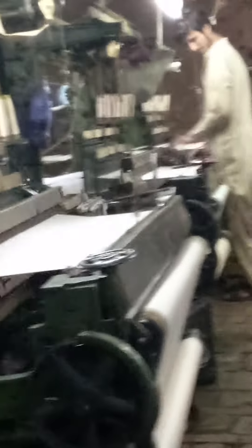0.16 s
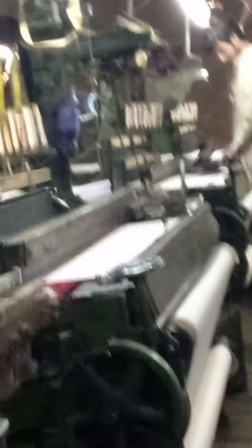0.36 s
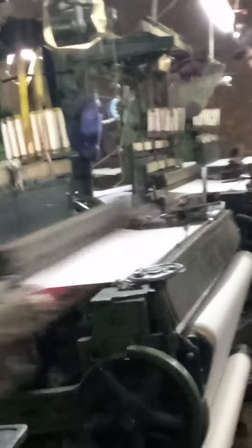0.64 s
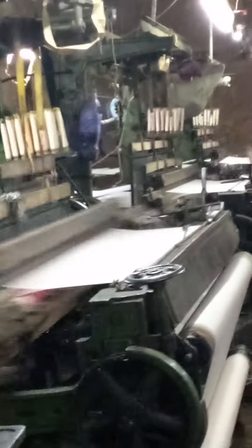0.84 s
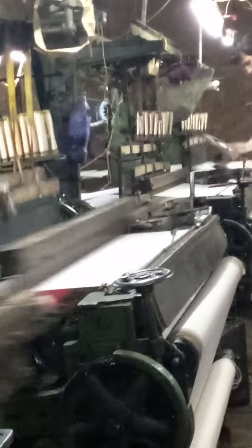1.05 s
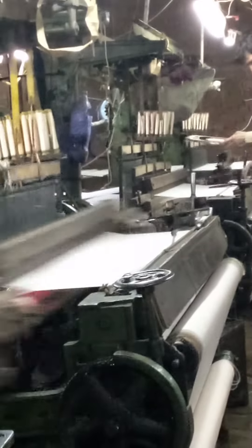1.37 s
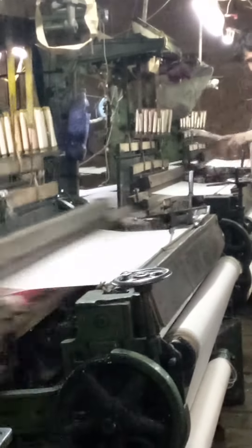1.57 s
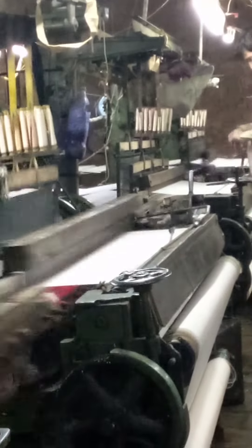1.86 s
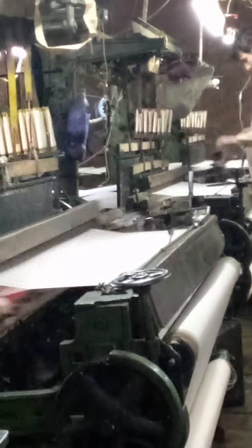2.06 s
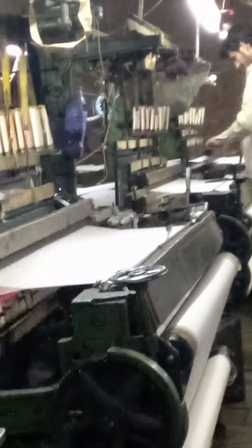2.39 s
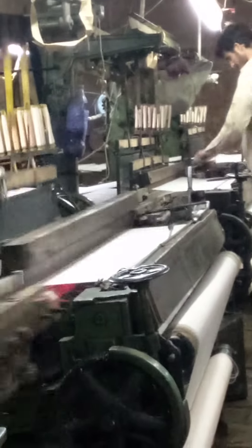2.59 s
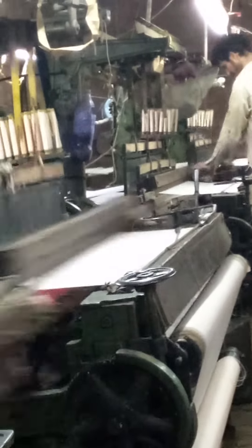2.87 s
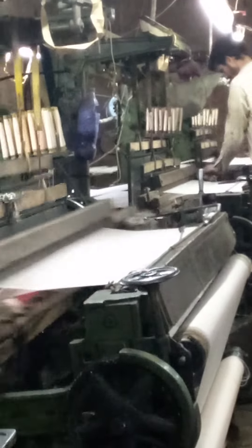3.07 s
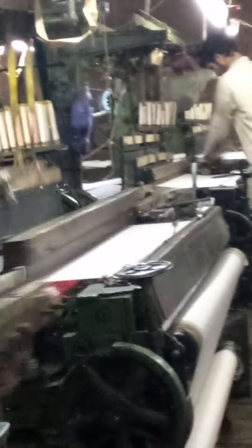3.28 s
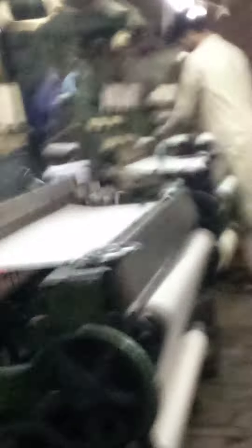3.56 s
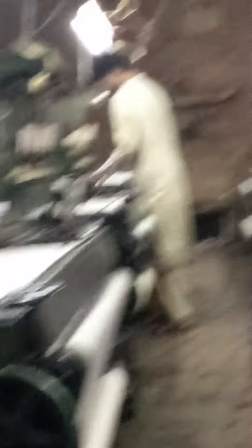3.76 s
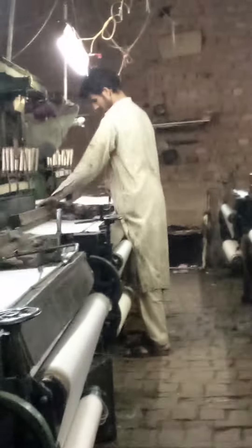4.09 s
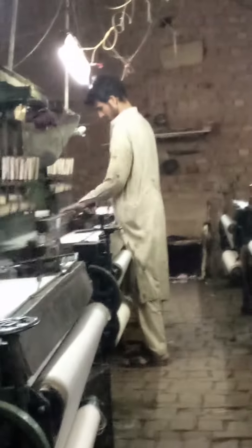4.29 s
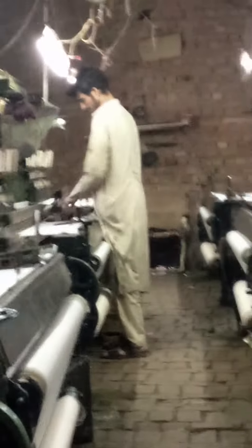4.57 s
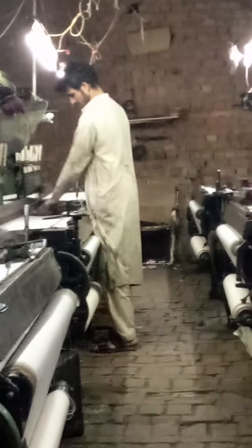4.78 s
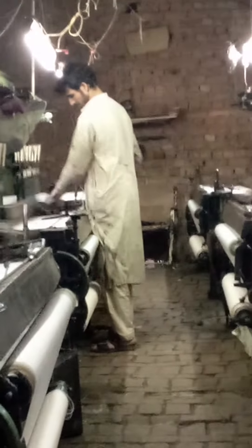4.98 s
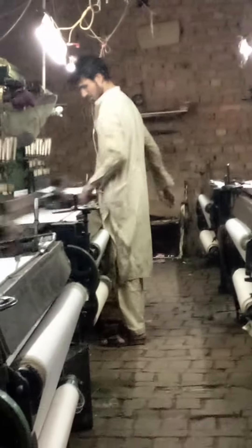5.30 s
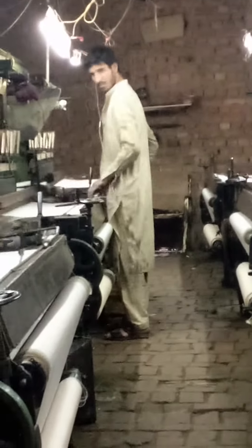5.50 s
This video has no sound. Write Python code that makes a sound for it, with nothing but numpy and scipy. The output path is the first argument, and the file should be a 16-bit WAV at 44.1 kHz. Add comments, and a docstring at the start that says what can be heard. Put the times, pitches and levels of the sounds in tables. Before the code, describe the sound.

From the first moment to the end at about 5.6 seconds, many power looms run in a low brick shed, making a loud, steady, dense clatter. The nearest looms strike sharp, briefly ringing metal knocks, several per second, mixed with thin ticks from loose steel parts and dull, heavy thuds. Each machine repeats its pattern roughly every 0.7 seconds, at a slightly different speed, so the beats drift and interlock. Harder cracks stand out near 0.1, 2.4 and 5.3 seconds. Two faint, high pings from small steel rods come at about 2 and 2.5 seconds, almost buried. Behind this, the other looms and their short echoes merge into a continuous din that swells slightly with each shuttle throw, over the low rumble of the drives. The small microphone is close to the machines, sounds harsh in the upper mids, and dips momentarily on the hardest blows.

```python
"""A low brick shed where rows of shuttle looms are running. Near looms at four slightly different speeds
beat out seven repeating series of knocks, ticks and thuds, and small steel rods ping twice. The blows of
all the other looms merge with their echoes into a din that swells with each pick (one throw of the
shuttle), over the rumble of the drives. A small microphone that favours the upper middle tones hears it
all, and its gain control turns the sound down for the hardest blows."""
import sys
import numpy as np
from scipy import signal
from scipy.fft import rfft, irfft
from scipy.io import wavfile
from scipy.ndimage import uniform_filter1d

SR = 44100
rng = np.random.default_rng(int(sys.argv[2]) if len(sys.argv) > 2 else 0)


def put_to_file(sound):
    """Save the sound as 16-bit audio at rate SR, in the file named by the first command-line argument."""
    columns = np.atleast_2d(sound).T  # one column per channel
    safe = np.clip(columns, -1, 1)
    whole_steps = np.round(safe * 32767)
    wavfile.write(sys.argv[1], SR, whole_steps.astype(np.int16))


N = 248724


def from_db(db):
    """Turn decibels into a factor to multiply a sound by."""
    return 10 ** (np.asarray(db) / 20)


def rms_one(x):
    """Scale a sound to an average strength (rms) of 1."""
    return x / np.sqrt(np.mean(x ** 2) + 1e-20)


def curve(points, repeat_s=None):
    """Join (time, value) points with straight lines, repeating if asked."""
    return np.interp(np.arange(N) / SR, *np.transpose(points), period=repeat_s)


def coloured(x, low_hz, high_hz, size=8192):
    """Keep one band of a sound and give it the tone of the iron frames, shed and microphone."""
    # how strongly these three together pass each frequency: (frequency [Hz], level [dB])
    tone = [(15, -66), (25, -42), (130, -9.5), (292, -9), (750, -5.5), (1220, -6.5), (1640, -3),
            (2040, -11), (2970, -3.5), (3500, -9), (4460, -25.5), (5530, -15), (8300, -24), (14200, -29.5),
            (15900, -39)]
    tone_hz, tone_db = np.transpose(tone)
    hz = np.maximum(np.arange(size // 2 + 1) * SR / size, 1)
    gain = from_db(np.interp(np.log(hz), np.log(tone_hz), tone_db))
    gain *= from_db(5 * np.exp(-((hz - 14500) / 2200) ** 2))   # the microphone's opening resonates
    gain /= np.sqrt((1 + (low_hz / hz) ** 8) * (1 + (hz / high_hz) ** 8))
    # a minimum-phase filter: nothing sounds before the blow that causes it
    cepstrum = irfft(np.log(gain + 1e-9))
    cepstrum[1:size // 2] *= 2
    cepstrum[size // 2 + 1:] = 0
    response = irfft(np.exp(rfft(cepstrum)))
    return signal.fftconvolve(x, response / np.sqrt(np.sum(response ** 2)))[:N]


def strike_shape(t, db, fade_s, rise_s):
    """The strength of one blow: it rises fast and dies away. A fade time is the time to fall 60 dB."""
    return from_db(db - 60 * t / max(fade_s, .004)) * (1 - np.exp(-t / rise_s))


def bursts(times, levels_db, fades_s, rise_s):
    """The strength of many blows over time; where they overlap, their power adds up."""
    power, t = np.zeros(N), np.arange(SR // 4) / SR
    for s, db, fade_s in np.broadcast(times, levels_db, fades_s):
        i = round(s * SR)
        power[i:i + len(t)] += strike_shape(t, db, fade_s, rise_s)[:N - i] ** 2
    return np.sqrt(power)


def rings(times, levels_db, pitches_hz, fades_s, rise_s):
    """Each struck part rings briefly with two close tones of its own."""
    out, t = np.zeros(N), np.arange(SR // 8) / SR
    chance = rng.random((len(times), 2))
    for s, db, hz, fade_s, (apart, phase) in zip(times, levels_db, pitches_hz, fades_s, chance):
        i = round(s * SR)
        second_hz = hz * (.85 + .309 * apart)
        pair = np.sin(2 * np.pi * hz * t) + .9 * np.sin(2 * np.pi * (second_hz * t + phase))
        out[i:i + len(t)] += (pair * strike_shape(t, db, fade_s, rise_s))[:N - i]
    return out


def turn_after_turn(patterns, singles, level_columns, spread_db=1.5):
    """Repeat each series' pattern every turn, with uneven force; add the single hits; return columns."""
    # the turns (two picks each) of the near looms, one list per series: (time [s], force [dB])
    series_turns = [
        [(.4654, -2), (1.1858, -1), (1.906, -2), (2.6229, -0.5), (3.3459, -1.5), (4.0657, -1.5), (4.788, -4.5),
         (5.512, -5)],
        [(.127, 1.5), (.8435, 2.5), (1.5574, 0.), (2.2747, 2.5), (2.9891, -1), (3.7091, 3), (4.4253, 2.5),
         (5.1438, -0.5)],
        [(.3298, -0.5), (1.0346, -3), (1.7443, 1), (2.4575, 2), (3.1667, 2.5), (3.876, -1), (4.5809, -2.5),
         (5.2821, 0.)],
        [(.157, 1), (.887, 0.), (1.621, -3), (2.353, 1), (3.087, -4), (3.818, 1), (4.55, -2), (5.281, 7.5)],
        [(.2554, 2.5), (.9776, 3), (1.7022, 1), (2.4147, 0.), (3.137, -2), (3.862, -3), (4.5783, 3.),
         (5.2988, 1.5)],
        [(.6944, -7), (1.4061, 6.5), (2.1158, 1.5), (2.8327, 1), (3.5339, 2.5), (4.2422, 2), (4.9475, -3.5)],
        [(.713, 6), (1.4445, -13), (2.1743, 5), (2.906, 2), (3.633, 2.), (4.3638, 4.5), (5.1052, 3.5)],
    ]
    rows = []
    for turns, pattern in zip(series_turns, patterns):
        for s, force_db in turns:
            for delay_s, *values in pattern:
                levels = np.add(values[:level_columns], force_db + spread_db * rng.standard_normal())
                rows.append((s + delay_s, *levels, *values[level_columns:]))
    return np.transpose([row for row in rows + list(singles) if .05 < row[0] < N / SR])


def rumble():
    """The low roar of the drives and the shaking floor."""
    # shafts, gears and floor: (time [s], level [dB])
    loudness = [(0, -34.5), (1.5, -35.5), (3, -35), (4.5, -34.5), (5.64, -36)]
    return from_db(curve(loudness)) * coloured(rng.standard_normal(N), 8.9, 224)


def far_looms(blows_per_s=700, spread_db=3.5, ring_fade_s=.027):
    """A din of random, uneven blows: some crack, some ring briefly, most drown in their echoes."""
    # the din's middle band before the swells are added: (time [s], level [dB])
    loudness = [(0.0, -19.5), (1.63, -21), (1.79, -21), (2.54, -20), (2.78, -19.5), (3.27, -20.5),
                (4.21, -21), (4.32, -21), (4.81, -19.5), (5.23, -21), (5.64, -20.5)]
    # swells with the picks of the faster and the slower looms: (time in the turn [s], level change [dB])
    fast_swell = [(0, 0.59), (.06, -0.81), (.14, 0.3), (.24, -0.64), (.33, 0.24), (.42, -0.71), (.52, 0.98),
                  (.62, -0.093), (.68, .6)]
    slow_swell = [(0, -0.063), (.1, 0.39), (.18, -.5), (.26, -0.5), (.32, 0.39), (.4, -1.2), (.48, 0.93),
                  (.57, -0.019), (.64, 0.95)]
    # the din's low, middle and high bands: (bottom [Hz], top [Hz])
    bands = [(300, 2000), (2000, 4500), (4500, 20000)]
    sizes = from_db(spread_db * np.minimum(rng.exponential(1, N), 4.5)) * rng.choice([-1, 1], N)
    clicks = rms_one(sizes * (rng.random(N) < blows_per_s / SR))
    struck_part, ringing = rng.integers(0, 32, N), 0   # each click strikes one of 32 parts
    decay = from_db(-60 / (ring_fade_s * SR))
    for part, hz in enumerate(np.geomspace(600, 7000, 32)):
        resonator = [1, -2 * decay * np.cos(2 * np.pi * hz / SR), decay * decay]
        ring = signal.lfilter([1], resonator, clicks * (struck_part == part) + 1e-18)
        ringing += np.sqrt(hz) * rms_one(ring)   # higher parts stand for a wider range of pitches
    echoes = rng.standard_normal(N)
    din = rms_one(from_db(-8) * clicks + from_db(-12) * rms_one(ringing) + echoes)
    middle_db = curve(loudness) + curve(fast_swell, repeat_s=.709) + curve(slow_swell, repeat_s=.72)
    swing_db = middle_db - middle_db.mean()
    levels_db = [swing_db - 24.5, middle_db, swing_db - 35]
    return sum(from_db(db) * coloured(din, *band) for db, band in zip(levels_db, bands))


def shed_echoes(x, fade_s=.11):
    """Walls and machines throw back so many echoes that they blur into a dying tail of noise."""
    t = np.arange(SR) / SR
    tail = rng.standard_normal(SR) * from_db(-60 * t / fade_s) * (t > .006)
    return signal.fftconvolve(x, tail / np.sqrt(np.sum(tail ** 2)))[:N]


def rod_pings():
    """Small steel rods ring with a thin, high note."""
    # struck rods: (time [s], level [dB], pitch [Hz], fade time [s])
    pings = [(2.025, -22, 14000, .03), (2.5, -41, 4970, .06)]
    return rings(*np.transpose(pings), rise_s=.002)


def thuds():
    """Heavy, dull blows carried by the frames and the floor."""
    # the sley, a swinging beam, beats the thread in; per series: (time in the turn [s], level [dB])
    patterns = [
        [(-.41, -20.5)],
        [],
        [(.33, -19)],
        [(.44, -15.5)],
        [],
        [],
        [],
    ]
    # thuds that do not repeat: (time [s], level [dB])
    singles = [(.218, -19), (1.015, -21), (1.37, -13.5), (2.224, -13), (2.45, -22), (2.79, -16),
               (2.956, -14.5), (3.241, -14), (3.996, -15), (5.256, -23)]
    times, level_db = turn_after_turn(patterns, singles, level_columns=1)
    strength = bursts(times, level_db - 7.5, fades_s=.13, rise_s=.005)
    return coloured(rng.standard_normal(N) * strength, 130, 614)


def rattles():
    """Loose, thin steel parts tick and chatter in the treble, swelling fast and fading a bit slower."""
    # per series: (time in the turn [s], level below 8.8 kHz [dB], level above [dB], rise time [s])
    patterns = [
        [(0.0001, -25, -28.5, .0058)],
        [(.0001, -36, -29.5, .001), (.213, -31, -33.5, 0.0024)],
        [(-.143, -25, -30.5, .0013), (.0001, -35, -25.5, .001)],
        [(.0001, -33, -36, .001)],
        [(.003, -33, -33, 0.00089)],
        [],
        [],
    ]
    # ticks that do not repeat: (time [s], then the same columns)
    singles = [(.0867, -37, -32, 0.0011), (.2654, -22, -36, .0007), (1.67, -40, -34, .002),
               (4.5809, -32, -31, .0007), (2.79, -36, -36, .0011), (3.7984, -36, -30, 0.00094),
               (4.5417, -38, -34, .0018), (4.701, -21, -31, 0.00056), (4.7187, -28, -36, 0.00056),
               (5.473, -25, -34, 0.00039)]
    t, lower, upper = np.arange(N) / SR, np.zeros(N), np.zeros(N)
    for s, lower_db, upper_db, rise_s in turn_after_turn(patterns, singles, level_columns=2).T:
        span = slice(round((s - .04) * SR), round((s + .06) * SR))
        past_peak = (t[span] - s) / max(rise_s, .0004)
        swell = np.exp(-np.where(past_peak < 0, past_peak, .54 * past_peak) ** 2)
        lower[span] += from_db(lower_db - 3) * swell
        upper[span] += from_db(upper_db + .1) * swell
    noise = rng.standard_normal((2, N))
    return coloured(noise[0] * lower, 6200, 8800) + coloured(noise[1] * upper, 8800, 18000)


def knocks(pitch_spread=.045):
    """Each blow of a near loom is a crack, a short chatter and a ring; the highest band dies first."""
    # blows, per series: (time in the turn [s], level [dB], pitch of the struck part [Hz],
    # low band offset [dB], high band offset [dB], fade time of the ring [s])
    patterns = [
        [(-.385, -15, 2760, 0, -25, .022), (.011, -17, 3000, -12, 2, .025)],
        [(-.001, -12, 2840, 2, -21, 0.023), (0, -13, 1650, -11, -25, 0.035), (.212, -5.5, 3030, -9, -18, 0.017),
         (.333, -13.5, 2960, -10, -16, 0.036), (.354, -7, 3007, -7, -24, 0.03),
         (.384, -20, 2920, -6, -24, 0.021), (.49, -20, 2900, -1, -15, 0.026), (.518, -16, 3120, 0, -11, 0.03)],
        [(-.143, -6.5, 3210, -21, -29, 0.021), (-.001, -8, 2956, -2, -12, 0.018), (0, -7, 1460, -9, -25, 0.021),
         (.21, -6.5, 2770, -1, -20, 0.027), (.339, -19, 1480, -1.5, -23, 0.01)],
        [(-.001, -7.5, 1500, -3.5, -16, 0.011)],
        [(0, -4, 2790, -10, -22, 0.016)],
        [(0, -7, 3050, -7.5, -13, 0.017), (.001, -8.5, 1680, -7, -18, .022)],
        [(0, -12, 3310, -10, -21, 0.0092)],
    ]
    # blows that do not repeat: (time [s], then the same columns)
    singles = [(0.1042, 0, 2940, -13, -19, 0.022), (0.665, -17, 2860, 0, -19, 0.029),
               (0.9328, -22, 3230, 5, -19, 0.022), (0.9973, -19, 3000, -9, -17, 0.019),
               (1.016, -12, 2700, -11, -15, 0.019), (1.0829, -20, 2830, -14, -21, 0.016),
               (1.477, -15, 2870, -1, -19, 0.022), (1.543, -16, 1630, 2, -23, 0.025),
               (1.6396, -6, 3100, -9, -16, 0.0075), (1.8284, -13, 2970, -11, -16, 0.025),
               (1.8561, -7, 3040, -9, -12, 0.022), (2.013, -14, 2830, -9, -19, 0.022),
               (2.228, -11.5, 1410, -16, -19, 0.022), (2.2614, -7, 2620, -8, -23, 0.022),
               (2.4015, -2.5, 2800, -2, -19, 0.016), (2.648, -12, 3030, -9, -19, 0.013),
               (2.9574, -10, 2900, 5, -19, 0.016), (3.124, -8.5, 2650, -2, -17, 0.015),
               (3.3757, -9, 2640, -6, -12, 0.022), (3.4511, -6, 2680, -5, -24, 0.013),
               (3.5787, -16, 3000, -9, -17, 0.019), (3.6547, -13, 3240, -5, -19, 0.02),
               (3.975, -11, 2840, -11, -17, 0.035), (4.139, -5.5, 2540, -16, -19, 0.016),
               (4.2718, -16, 2780, -9, -15, 0.016), (4.3146, -10, 3120, 0, -17, 0.029),
               (4.3904, -13, 3180, -7, -19, 0.034), (4.5386, -8, 2980, -9, -19, 0.018),
               (4.5617, -8.5, 2610, 0, -19, 0.02), (4.6982, -5.5, 2880, -13, -21, 0.024),
               (4.9159, -5, 2620, -5, -12, 0.022), (5.4495, -10, 2940, -10, -19, 0.022),
               (5.472, -6, 2770, -18, -19, 0.014)]
    times, level_db, hz, low_db, high_db, fade_s = turn_after_turn(patterns, singles, level_columns=1)
    # chatter bands: (level [dB], fade time [s], bottom [Hz], top [Hz])
    bands = [(level_db + low_db - 8, 2.05 * fade_s, 300, 2000),
             (level_db - 7, 3.75 * fade_s, 2000, 4500),
             (level_db + high_db - 1, .48 * fade_s, 4500, 8000)]
    noise = rng.standard_normal(N)
    chatter = sum(coloured(noise * bursts(times, db, fade, rise_s=.0002), bottom, top)
                  for db, fade, bottom, top in bands)
    cracks = np.zeros(N)   # the first hard touch
    cracks[np.round(times * SR).astype(int)] = from_db(level_db + 4)
    pitches_hz = hz * (1 + pitch_spread * rng.standard_normal(len(times)))   # never quite the same twice
    ringing = rings(times, level_db - 2, pitches_hz, fade_s, rise_s=.00072)
    return coloured(cracks, 870, 9100) + chatter + ringing


def scene():
    """The near looms and their echoes over the far din and the rumble, in one channel."""
    near = knocks() + rattles() + thuds() + rod_pings()
    return (near + from_db(-6) * shed_echoes(near) + far_looms() + rumble())[None]


def record(dry, limit_db=-6.5, share_removed=.62, recovery_db_per_s=190):
    """Gain control dips at the start of each 20 ms frame that holds a loud peak, then recovers."""
    frame, first_frame = round(.02 * SR), round(.011 * SR)
    frame_number = (np.arange(N) + frame - first_frame) // frame
    peaks = np.maximum.reduceat(np.abs(dry[0]), np.r_[0, np.arange(first_frame, N, frame)])
    excess_db = np.maximum(20 * np.log10(peaks) - limit_db, 0)[frame_number]
    recovery_db = recovery_db_per_s * np.arange(N) / SR
    dip_db = np.maximum.accumulate(share_removed * excess_db + recovery_db) - recovery_db
    dip_db = uniform_filter1d(dip_db, size=30)   # soften the steps
    treble_cut = signal.ellip(14, .3, 75, 15950, fs=SR, output="sos")   # removes the very highest tones
    return signal.sosfilt(treble_cut, dry * from_db(-dip_db))


dry = scene()
out = record(dry)
put_to_file(out)
```